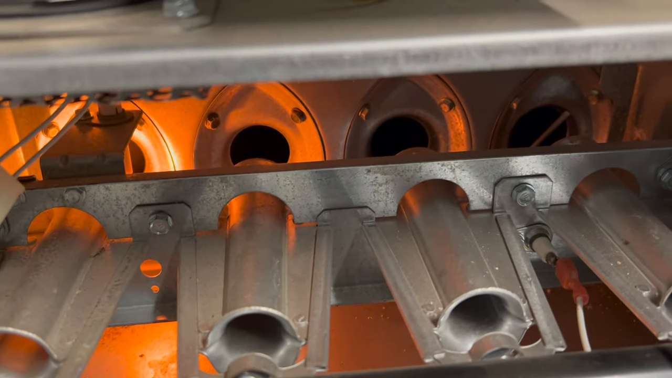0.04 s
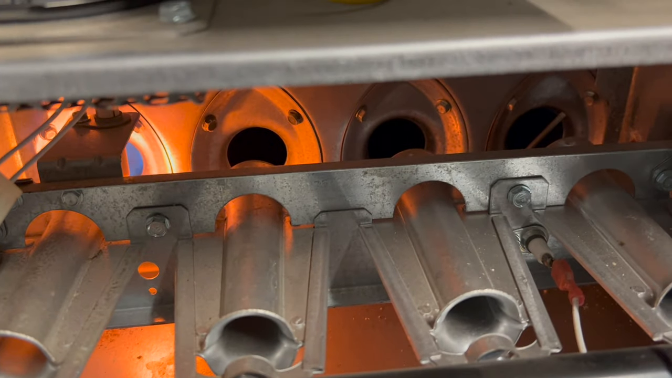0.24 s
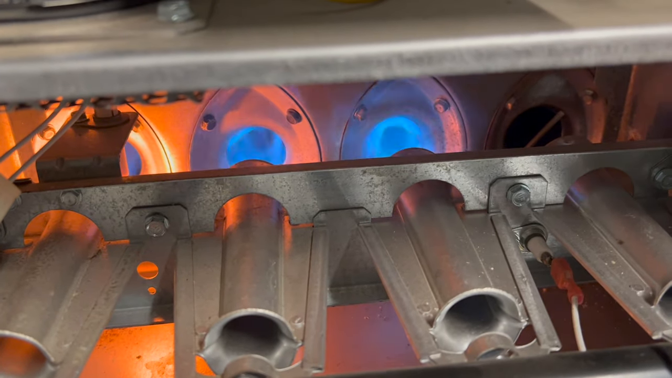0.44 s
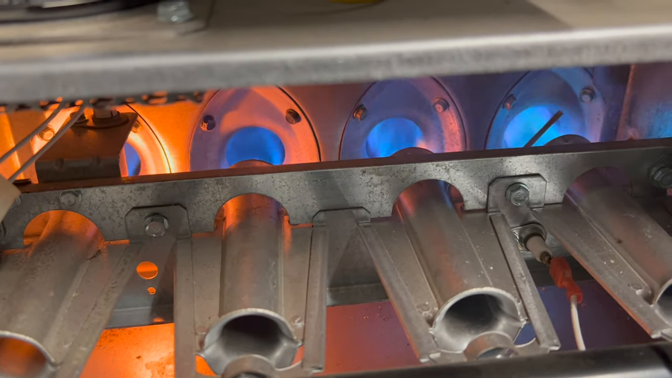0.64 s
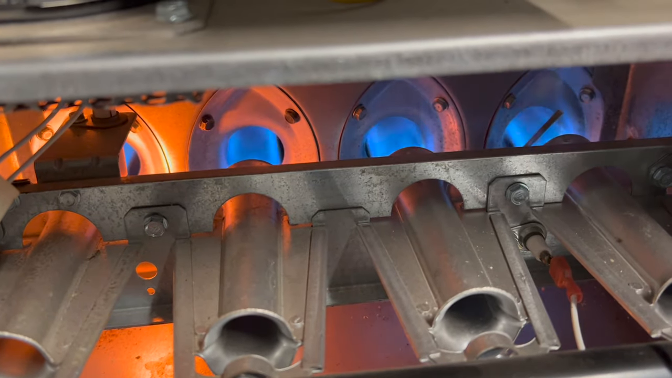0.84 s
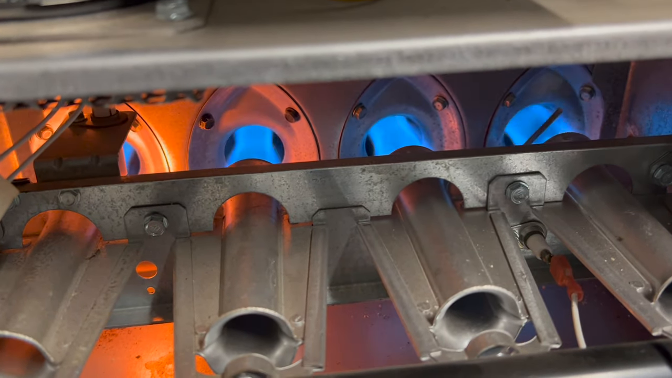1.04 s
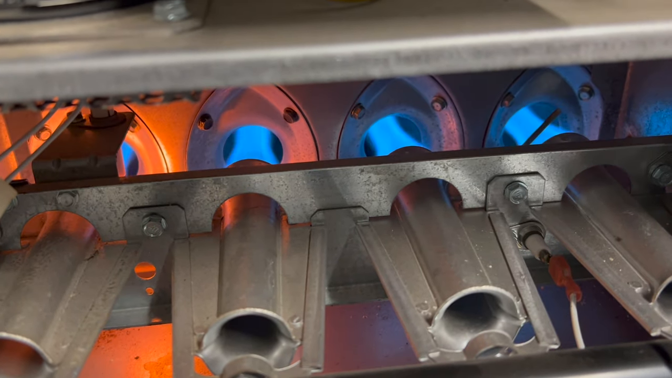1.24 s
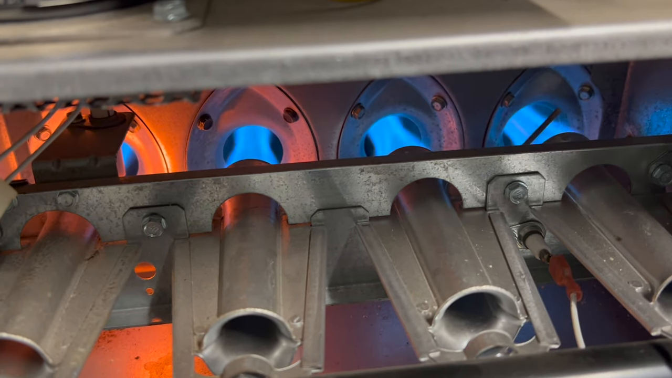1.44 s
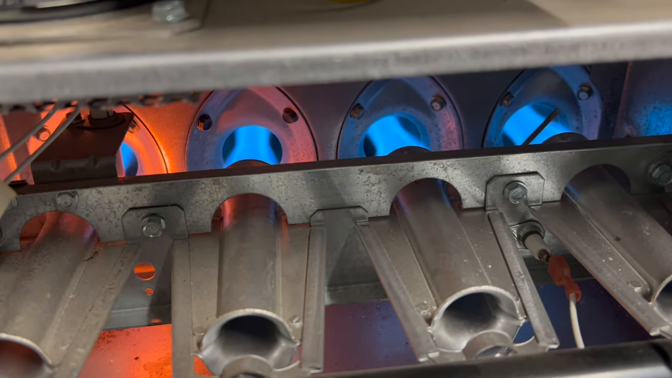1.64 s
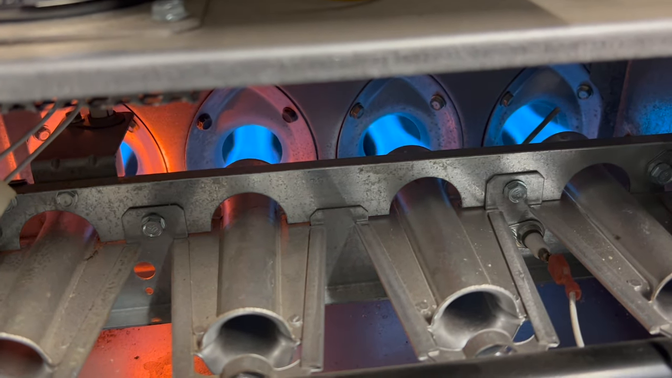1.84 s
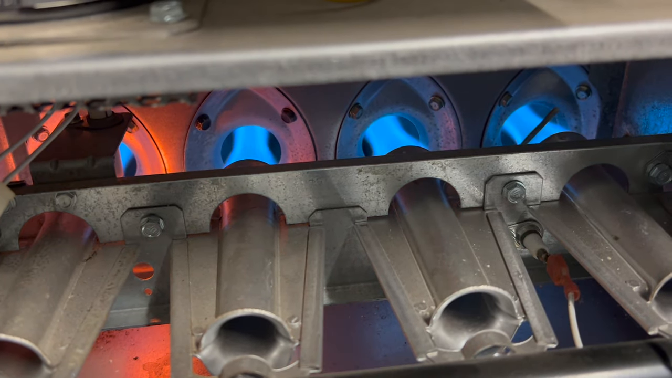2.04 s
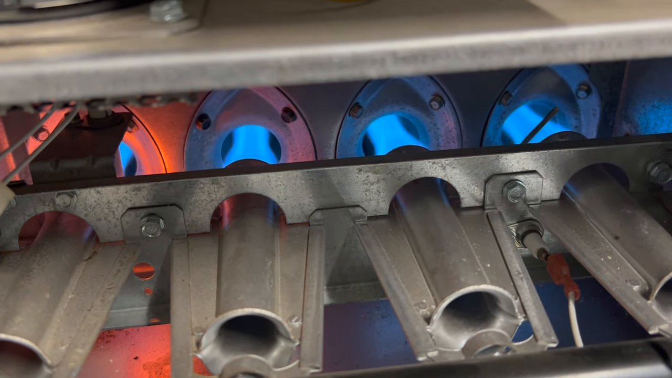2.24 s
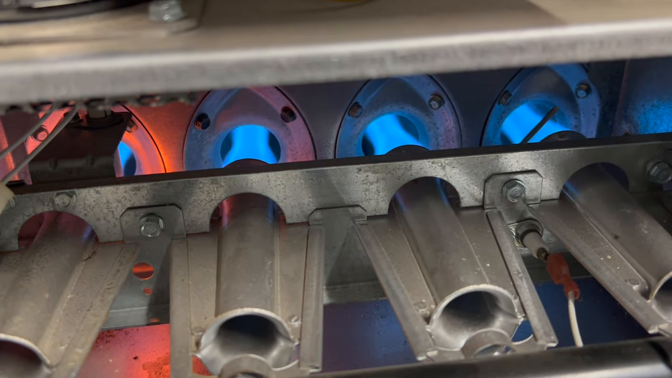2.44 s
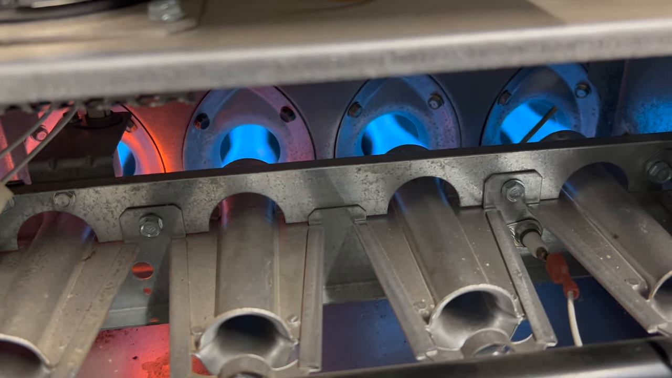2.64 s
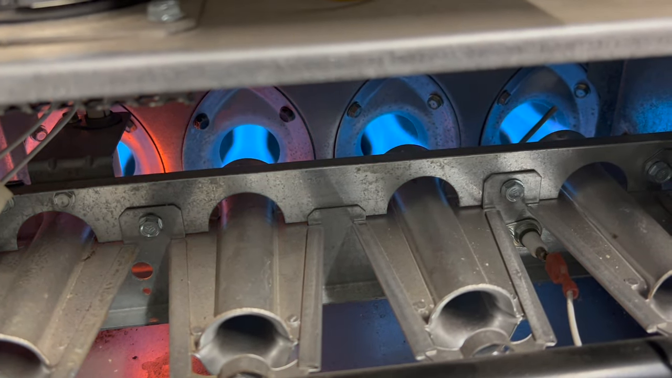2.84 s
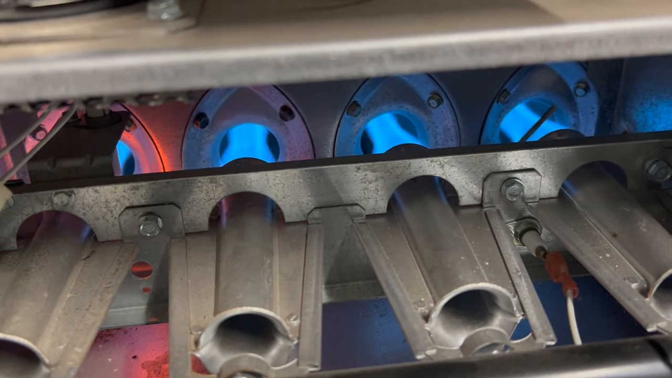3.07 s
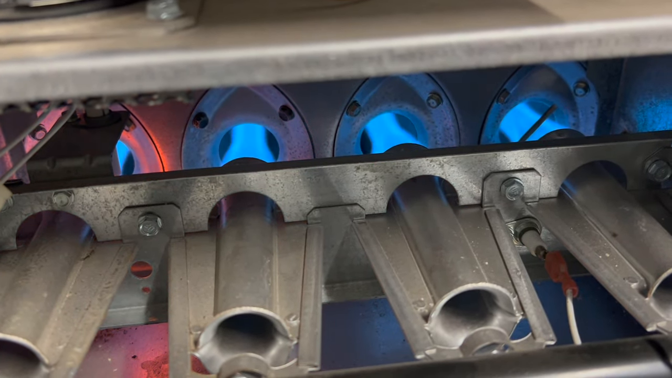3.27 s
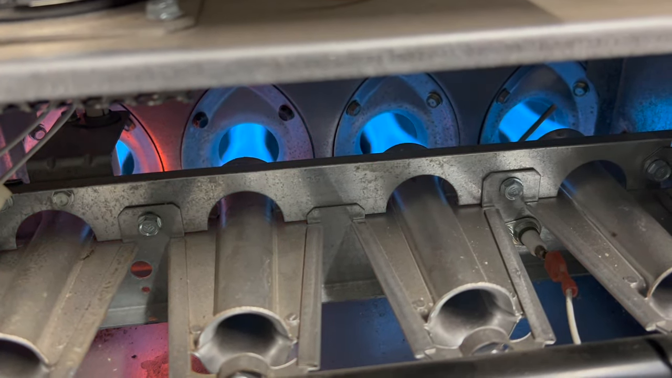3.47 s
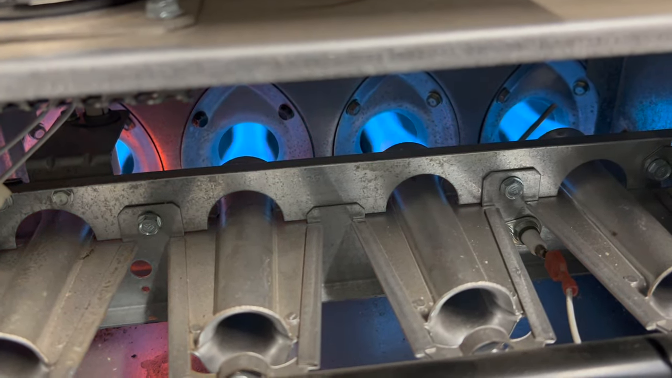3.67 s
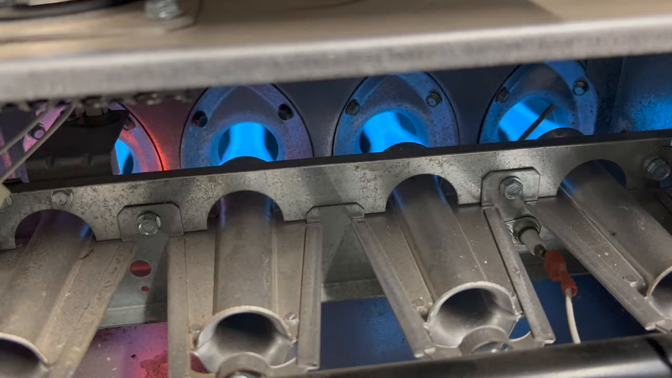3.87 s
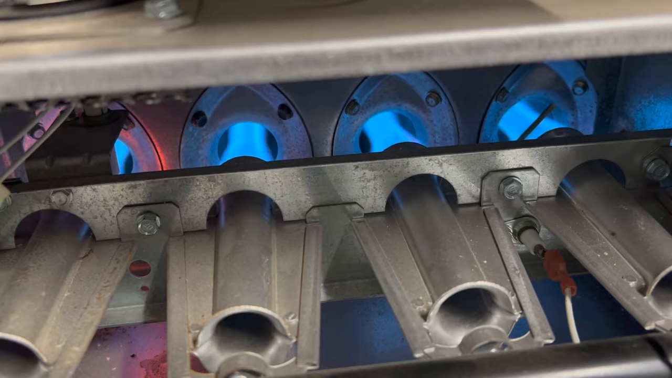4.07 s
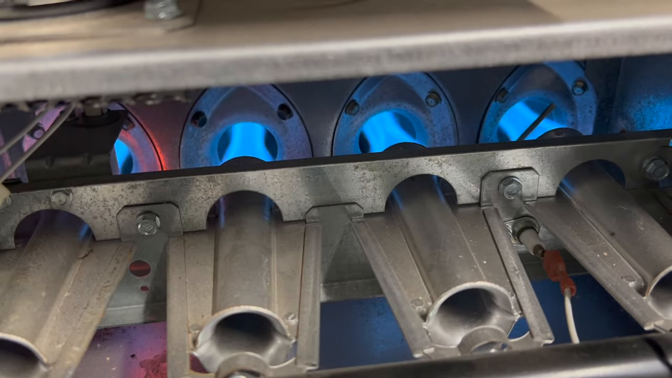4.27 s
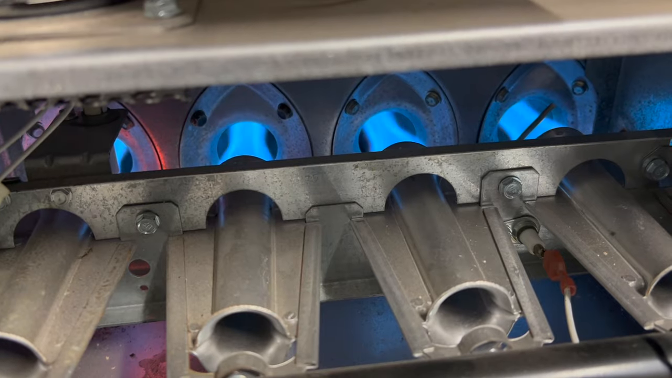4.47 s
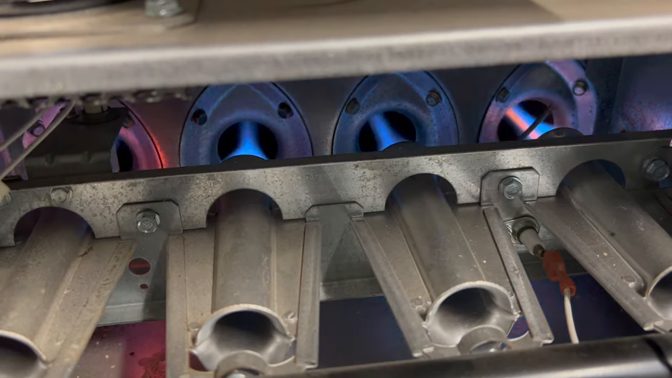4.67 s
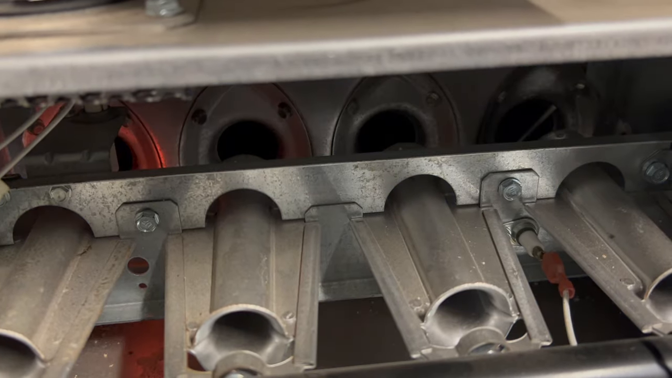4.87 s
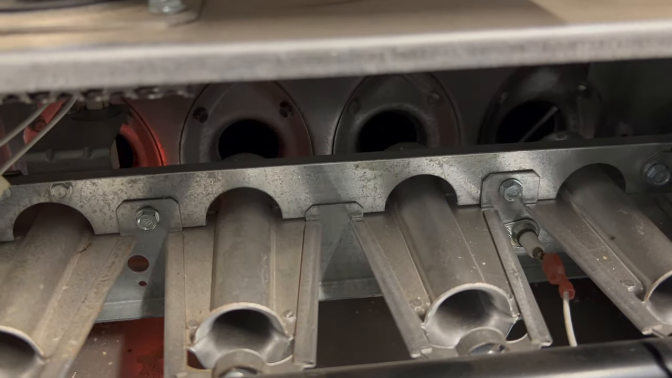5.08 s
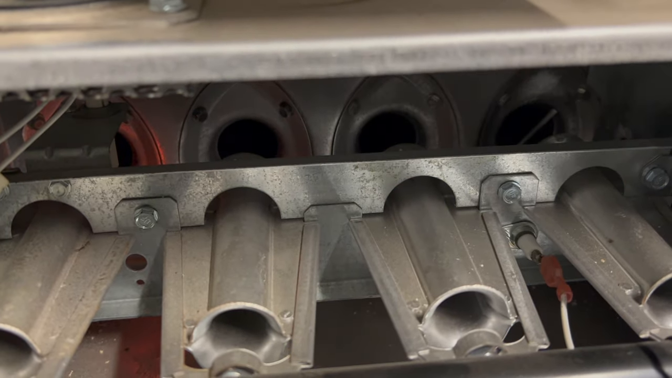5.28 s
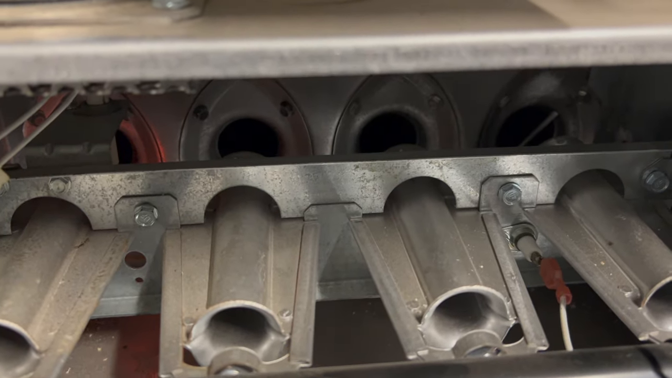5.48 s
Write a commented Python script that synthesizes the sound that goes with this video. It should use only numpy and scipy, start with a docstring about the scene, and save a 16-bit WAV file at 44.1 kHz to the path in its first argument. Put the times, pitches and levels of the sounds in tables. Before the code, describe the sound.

A gas furnace's fan runs steadily, heard close up in stereo. The gas valve clunks open, the jets hiss, and six burners light in quick succession with soft whumps. The flames build to a low rumble and hollow roar with a faint whistle. After a few seconds the valve shuts with a sharp clunk and the fire dies at once. A soft bump follows as the fan runs on.

```python
"""A gas furnace, heard from close by on a camera's stereo microphone. The draft fan is already running.
At 0.13 s the gas valve clunks open and the jets hiss; within the first second six burners light in
turn, a whump each. The flames build to a rumble and roar, singing in the exchanger tubes, and from
1.2 s the burners whistle. Near 4.7 s the valve shuts and the flames die; a soft bump follows at 5.2 s
while the fan runs on."""
import sys
import numpy as np
from scipy import signal
from scipy.fft import rfft, irfft, next_fast_len
from scipy.io import wavfile
from scipy.ndimage import uniform_filter1d, map_coordinates

SR = 44100
rng = np.random.default_rng(int(sys.argv[2]) if len(sys.argv) > 2 else 0)


def generate_wav(sig):
    """Save sig (samples, or channels by samples) to the path in sys.argv[1] as 16-bit PCM at SR."""
    pcm = np.round(np.clip(np.atleast_2d(sig).T, -1, 1) * 32767).astype(np.int16)
    wavfile.write(sys.argv[1], SR, pcm)


N = 242991

# Strength of the fire: time_s, rumble_db, roar_db
FLAME_LEVELS = [(.1, -33, -26.5), (.2, -31, -22), (.3, -22, -24), (.4, -24, -23), (.55, -29, -22),
                (.8, -21.5, -26.5), (1.02, -15.5, -21.5), (1.13, -17, -23), (1.2, -12.5, -18),
                (1.29, -13.5, -20), (1.38, -10, -21.5), (1.49, -18, -24.5), (1.68, -12, -18.5),
                (2.26, -12, -22), (3.3, -12.5, -23), (3.46, -15.5, -21), (3.55, -11.5, -23),
                (4.69, -13.5, -22.5), (4.73, -26, -26.5), (4.86, -39, -27.5)]
# Spectra of the low rumble and of the roar above it: freq_hz, relative_db
RUMBLE_SPECTRUM = [(15, -65), (25, -80), (35, -66), (51, -7.5), (80, 2), (95, -3.5), (149, -7), (200, -27),
                   (260, -15), (440, -120)]
ROAR_SPECTRUM = [(100, -2.5), (170, -6), (250, -2.5), (317, -21), (413, -5.5), (600, -15), (1060, -19.5),
                 (1230, -22.5), (1420, -33), (3000, -39.5), (3900, -62), (6600, -120)]
# Cabinet boom and flame-driven modes of the exchanger tubes: pitch_hz, width_hz, relative_db
CABINET_BOOM = [(87.04, 8.6, -4.5)]
TUBE_MODES = [(241, 40, -37), (414, 45, -35), (686, 49, -37), (937, 13, -48), (1040, 40, -45),
              (1085, 94, -42.5), (1316, 20, -48)]
# Brief surges and whistles as the flames settle: centre_s, half_length_s, pitch_hz, width_hz, level_db
SETTLING_SURGES = [(1.346, 0.053, 1252, 20, -34.5), (1.35, 0.05, 1033, 32, -31),
                   (0.956, 0.043, 420, 430, -28.5), (1.185, .05, 504, 300, -24), (1.31, .1, 400, 350, -25),
                   (1.22, .17, 120, 41, -16)]
# The fire's side signal at the microphone, against its mid: freq_hz, gain_db
FLAME_SIDE_GAIN = [(60, -35), (110, -23.5), (200, -15), (380, -18.5), (700, -8), (1290, -3), (2380, -20),
                   (4400, -16), (8120, -43), (15000, -14)]
SONG_OVER_RUMBLE_DB, FLICKER_PER_S = 13.5, 12


def flames():
    """Turbulent burning rumbles in the cabinet, roars and sings in the tubes."""
    t = np.arange(N) / SR
    rumble_db, roar_db = curves(FLAME_LEVELS)
    # the tubes follow the rumble slowly and late
    song_db = SONG_OVER_RUMBLE_DB + uniform_filter1d(rumble_db, size=SR // 6, origin=SR // 16)
    flicker = wobble(FLICKER_PER_S)

    def turbulence():
        rumble = steady_supply(rush(RUMBLE_SPECTRUM, patchy_db=-0.2) + resonances(CABINET_BOOM))
        roar = steady_supply(rush(ROAR_SPECTRUM, patchy_db=0.9))
        song = sum(amp(db) * steady_supply(resonances([(hz, width, -10)]))
                   for hz, width, db in TUBE_MODES)
        return (amp(rumble_db + 0.63 * flicker) * rumble + amp(roar_db + 0.66 * flicker) * roar
                + amp(song_db) * song)

    surges = sum(bell(t, s, half_s) * resonances([mode]) for s, half_s, *mode in SETTLING_SURGES)
    mid = turbulence() + surges
    side = filtered(turbulence(), lambda hz: amp(along(FLAME_SIDE_GAIN, hz)))
    return sum_and_difference(mid, side)


def steady_supply(x):
    """The constant gas supply evens out slow swells and leaves the fast flutter."""
    slow_power = np.abs(uniform_filter1d(x ** 2, size=SR // 5))
    return unit(x / np.sqrt(slow_power + .1))


# Burners catching: start_s, whump_db, pitch_fall_hz, final_pitch_hz, puff_db, fizz_db, box_db
IGNITIONS = [(0.139, -13.5, 302, 71.5, -26.5, -48, -20), (0.212, -16, 300, 68.6, -37, -51, -13),
             (0.3175, -4, 512, 54, -26.5, -33, -7.5), (0.4203, -5, 325, 78, -24, -36, -18.5),
             (0.539, -5.5, 477, 61, -27, -35, -11.5), (0.92, -10.5, 290, 79, -35, -50, -34)]
GLIDE_S, WHUMP_S, PUFF_LEAD_S, RING_DELAY_S = 0.0043, 0.028, 0.0089, 0.0038


def ignitions():
    """Each flame front runs into its tube: a puff, then a pressure pulse of falling pitch."""
    out, t = np.zeros(N + SR), np.arange(SR // 5) / SR
    puff_band = signal.butter(4, [400, 1250], 'bandpass', fs=SR)
    fizz_band = signal.butter(3, 7500, fs=SR)
    swell = 2 * (t / WHUMP_S) ** 0.65 * np.exp(-(t / WHUMP_S) ** 3)
    ring = box_ring(np.maximum(t - RING_DELAY_S, 0))
    for s, whump_db, fall_hz, final_hz, puff_db, fizz_db, box_db in IGNITIONS:
        hz = final_hz + fall_hz * np.exp(-t / GLIDE_S)
        whump = swell * np.sin(2 * np.pi * np.cumsum(hz) / SR)
        air = rng.standard_normal(len(t))
        puff = amp(puff_db) * unit(signal.lfilter(*puff_band, air))
        fizz = amp(fizz_db) * signal.lfilter(*fizz_band, air)
        add_at(out, s - PUFF_LEAD_S, (puff + fizz) * bell(t, centre_s=0.014, half_s=0.01))
        add_at(out, s, amp(whump_db) * whump + amp(box_db) * ring)
    return out[:N]


# Plunger contacts, opening and then closing: start_s, blow_db, thud_db, tick_db
VALVE_CONTACTS = [(.134, -11, -20, -52), (.142, -4, -9, -50), (.155, -3, -9, -50), (.19, -5, -12, -52),
                  (4.641, -7, -32, -44), (4.675, 7, -14, -34), (4.682, 7.5, -10, -34),
                  (4.703, -3, -22, -37), (4.818, -14, -22, -43)]
# A small part rattling as the plunger moves: start_s, pitch_hz, level_db, t60_s, width_hz
RATTLE_PINGS = [(.137, 3600, -34, .14, 40), (.161, 3550, -37, .1, 400), (.176, 3500, -39, .2, 300),
                (4.635, 1470, -23, .12, 10), (4.82, 5100, -42, .07, 200)]
# Modes of the valve body and manifold: pitch_hz, width_hz, gain_db
VALVE_MODES = [(146, 49, 6.5), (327, 45, 6.5), (524, 343, -1.5), (660, 262, 2), (1260, 190, -8),
               (2410, 140, -17.5), (3330, 1100, -30)]
BLOW_T60_S, TICK_T60_S = 0.072, 0.03
BUMP_S, BUMP_DB = 5.183, -17.5


def valve():
    """The solenoid plunger knocks its damped body, thuds, ticks and pings; a soft bump comes last."""
    blows, direct, t = np.zeros(N + SR), np.zeros(N + SR), np.arange(SR // 10) / SR
    cushion = 1 - np.exp(-t / 0.0023)
    tick_band = signal.butter(1, [3000, 9000], 'bandpass', fs=SR)
    for s, blow_db, thud_db, tick_db in VALVE_CONTACTS:
        tick_noise = signal.lfilter(*tick_band, rng.standard_normal(len(t)))
        tick = cushion * amp(tick_db - 60 * t / TICK_T60_S) * tick_noise
        add_at(blows, s, cushion * amp(blow_db - 60 * t / BLOW_T60_S) * rng.standard_normal(len(t)))
        add_at(direct, s, tick + amp(thud_db) * box_ring(t))
    add_at(direct, BUMP_S, amp(BUMP_DB) * box_ring(t))
    for s, hz, db, t60, width in RATTLE_PINGS:
        phase_drift = np.cumsum(rng.normal(0, np.sqrt(2 * np.pi * width / SR), len(t)))
        add_at(direct, s, cushion * amp(db - 60 * t / t60) * np.sin(2 * np.pi * hz * t + phase_drift))
    body = lambda hz: sum((-1) ** k * amp(db) * resonator(hz, pitch, width)
                          for k, (pitch, width, db) in enumerate(VALVE_MODES))
    return filtered(blows[:N], body) + direct[:N]


# Air mode of the burner box: pitch_hz, t60_s
BOX_AIR = [(300, .1)]


def box_ring(t):
    """The air in the burner box rings hollow after a knock or an ignition."""
    attack = 1 - np.exp(-t / .002)
    return attack * sum(amp(-60 * t / t60) * np.sin(2 * np.pi * hz * t) for hz, t60 in BOX_AIR)


# Held tones of single burners: pitch_hz, level_db, left_minus_right_db
BURNER_TONES = [(512, -45, 0), (1024.13, -43, 7), (1027.81, -40.5, 3.5)]
FADE_IN_S, FADE_OUT_S, IN_STEP_S = (1.2, 1.6), (4.7, 4.86), 3.41


def burner_whistles():
    """Two burners, left of the microphone, beat on nearly the same note; one also sounds an octave down."""
    t, tones = np.arange(N) / SR, np.zeros((2, N))
    for hz, db, lean_db in BURNER_TONES:
        gain = np.sqrt(2) * amp(db + 2 * wobble(7)) * pan(lean_db)
        tones += gain * np.sin(2 * np.pi * hz * (t - IN_STEP_S) + .3 * wobble(6))
    return tones * np.interp(t, FADE_IN_S + FADE_OUT_S, [0, 1, 1, 0])


# Hiss of the gas flow: time_s, level_db
GAS_FLOW = [(.11, -55), (.15, -46), (.56, -45), (.69, -50), (.96, -44), (4.69, -45), (4.708, -48),
            (4.72, -61), (4.8, -63)]
# Hiss spectra at the microphone, mid and side: freq_hz, relative_db
JET_MID_SPECTRUM = [(1650, -1.5), (2800, -2.5), (3420, -38), (4200, -0.5), (4600, -10), (5100, -18),
                    (5800, 0.5), (6700, -3), (7500, -3.5), (8200, -4), (11000, -5), (12600, -2),
                    (14800, -9), (15150, -48)]
JET_SIDE_SPECTRUM = [(1650, -22), (2800, -4.5), (4660, -18.5), (5860, -4.5), (6900, -22), (8870, -2.5),
                     (10900, -6.5), (12200, -10), (12700, -28), (13000, -52), (13300, -37), (14000, -13),
                     (15500, -9)]
# Burner throat resonances: pitch_hz, width_hz, relative_db
THROAT_MODES = [(3910, 1600, -8.5), (5770, 890, -9.5), (7510, 440, -10.5)]
SPURT_S, SPURT_DB = 4.65, 8


def gas_jets():
    """Gas hisses through the orifices and burner throats, and spurts as the valve starts to close."""
    hiss_db, = curves(GAS_FLOW)
    spurt_db = SPURT_DB * bell(np.arange(N) / SR, SPURT_S, half_s=0.0076)
    flow = amp(hiss_db + spurt_db + 0.26 * wobble(12) + 0.3 * wobble(24.33))
    mid = rush(JET_MID_SPECTRUM, patchy_db=1.6) + resonances(THROAT_MODES)
    return flow * sum_and_difference(mid, rush(JET_SIDE_SPECTRUM, patchy_db=3.0))


# Fan air spectra at the microphone, mid and side: freq_hz, relative_db
AIR_MID_SPECTRUM = [(20, -48), (40, -28), (56, 6), (73, -9.5), (100, 2), (185, -18), (210, -8.5),
                    (320, -18.5), (420, -27), (900, -21.5), (1030, -40), (1220, -24.5), (1400, -26),
                    (2000, -26), (2600, -32.5), (3300, -39), (4200, -43), (5000, -47.5), (15000, -68)]
AIR_SIDE_SPECTRUM = [(15, -55), (25, -26), (221, -11), (282, -7), (322, -9), (379, -11), (509, -18),
                     (971, -9), (1050, -19), (1410, -12.5), (1580, -6), (1800, -24.5), (15500, -57)]
# Strength of that air: mid_db, side_db
AIR_LEVELS = [-28.5, -38.5]
# Fan motor tones: pitch_hz, level_db
MOTOR_TONES = [(56.6, -33), (904.5, -54), (1144.5, -53), (1201, -47), (1264, -49.5), (1920, -57),
               (2067, -63), (2215, -60), (2362.6, -67), (4135, -76), (4282.5, -73), (4430, -76)]
# Duct resonances: pitch_hz, width_hz, level_db
DUCT_MODES = [(307, 67, -35.5), (1594, 54, -50.5), (12600, 610, -59.5)]


def draft_fan():
    """Behind the fire, air rushes steadily, the motor hums with a slight waver and the ducts sing."""
    t = np.arange(N) / SR
    motor = sum(np.sqrt(2) * amp(db + 1.2 * wobble(4.21))
                * np.sin(2 * np.pi * hz * t + 0.24 * wobble(5.8)) for hz, db in MOTOR_TONES)
    mid_db, side_db = AIR_LEVELS
    mid = amp(mid_db) * rush(AIR_MID_SPECTRUM, patchy_db=1.5) + motor + resonances(DUCT_MODES)
    side = amp(side_db) * rush(AIR_SIDE_SPECTRUM, patchy_db=-0.4) + 0.057 * motor
    return sum_and_difference(mid, side)


def cabinet_echo(x, t60_s=0.028, above_hz=520):
    """A short, bright sheet-metal echo of the knocks, separate in each channel."""
    t = np.arange(SR // 5) / SR
    highs = filtered(x, lambda hz: hz ** 4 / (hz ** 4 + above_hz ** 4))
    tail = rng.standard_normal((2, len(t))) * amp(-60 * t / t60_s)
    return signal.fftconvolve(highs[None], tail / np.linalg.norm(tail[0]), axes=1)[:, :N]


def rush(spectrum, patchy_db):
    """Coloured noise of rms 1 with patches of random gain."""
    bins = signal.stft(rng.standard_normal(N), nperseg=512)[2]
    patches = uniform_filter1d(uniform_filter1d(rng.standard_normal(bins.shape), 8, 0), 8, 1)
    noise = signal.istft(bins * amp(patchy_db * unit(patches)), nperseg=512)[1][:N]
    return unit(filtered(noise, lambda hz: amp(along(spectrum, hz))))


def resonances(modes):
    """Noise singing in steep-sided resonances, each at its own level."""
    return sum(amp(db) * unit(filtered(rng.standard_normal(N), lambda hz: resonator(hz, pitch, width) ** 2))
               for pitch, width, db in modes)


def resonator(hz, pitch, width):
    """Frequency response of one damped mode."""
    return 1j * hz * width / (pitch ** 2 - hz ** 2 + 1j * hz * width)


def filtered(x, response):
    """x shaped by a frequency response."""
    size = next_fast_len(N + SR // 2)
    return irfft(rfft(x, size) * response(np.fft.rfftfreq(size, 1 / SR)), size)[..., :N]


def wobble(rate):
    """A smooth random curve, rate knots a second."""
    return map_coordinates(rng.standard_normal(int(N * rate / SR) + 4), [np.arange(N) * rate / SR])


def curves(rows):
    """One value per sample for each column after the time."""
    times, *columns = np.transpose(rows)
    return [np.interp(np.arange(N) / SR, times, column) for column in columns]


def along(points, hz):
    """Interpolate (freq_hz, value) points on a log axis."""
    freqs, values = np.transpose(points)
    return np.interp(np.log(hz + 1), np.log(freqs + 1), values)


def bell(t, centre_s, half_s):
    """A Gaussian swell."""
    return np.exp(-((t - centre_s) / half_s) ** 2)


def add_at(track, start_s, sound):
    """Mix a sound into a track."""
    track[round(start_s * SR):][:len(sound)] += sound


def amp(db):
    """Gain of a dB value."""
    return 10 ** (np.asarray(db) / 20)


def unit(x):
    """Scaled to rms 1."""
    return x / np.sqrt(np.mean(x ** 2) + 1e-20)


def pan(lean_db):
    """Left and right gains, lean_db apart."""
    return amp(lean_db * np.array([[.5], [-.5]]))


def sum_and_difference(a, b):
    """Turns mid and side into left and right, or those into twice mid and side."""
    return np.array([a + b, a - b])


def scene():
    """The furnace at close range, as it reaches the microphone's two ports."""
    knocks = valve()
    running = draft_fan() + gas_jets() + flames() + burner_whistles()
    return running + ignitions() + knocks + amp(-9.0) * cabinet_echo(knocks)


# A gap in the mid near 10 kHz, then one in the side near 13 kHz: centre_hz, half_width_hz
TREBLE_GAPS = [(9850, 764), (13000, 900)]
# Channel balance of the microphone: freq_hz, left_minus_right_db
MIC_BALANCE = [(60, 0.5), (180, 3), (550, -1.5), (1650, -0.5), (4970, 3), (15000, -7)]
LEAN_BELOW_HZ, LOW_CUT_HZ, TOP_HZ = 8000, 36, 15660


def record(dry):
    """The channels oppose near 10 kHz, merge near 13 kHz and lean below; rounded peaks, limited band."""
    centre, width = np.transpose(TREBLE_GAPS)[..., None]
    mid_side = sum_and_difference(*dry) / 2
    notched = filtered(mid_side, lambda hz: 1 - np.exp(-((hz - centre) / width) ** 6))
    left_right = sum_and_difference(*notched)
    leaning = filtered(left_right, lambda hz: pan(along(MIC_BALANCE, hz) * (hz < LEAN_BELOW_HZ)))
    rounded = leaning / (1 + np.abs(leaning / .95) ** 6) ** (1 / 6)
    return filtered(rounded, lambda hz: (hz < TOP_HZ) / np.sqrt(1 + (LOW_CUT_HZ / (hz + 1)) ** 8))


dry = scene()
out = record(dry)
generate_wav(out)
```